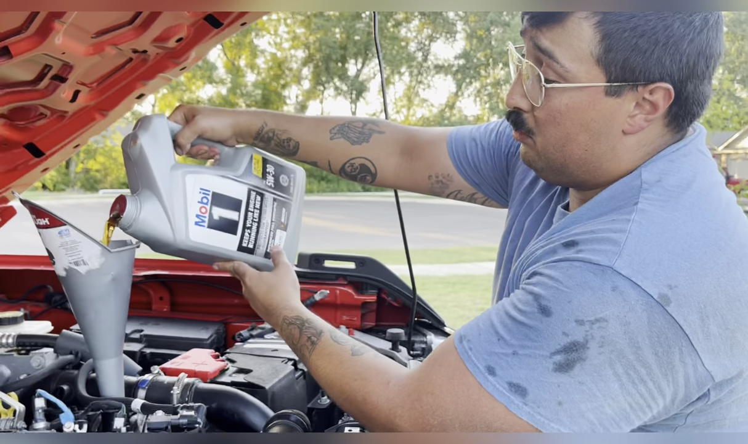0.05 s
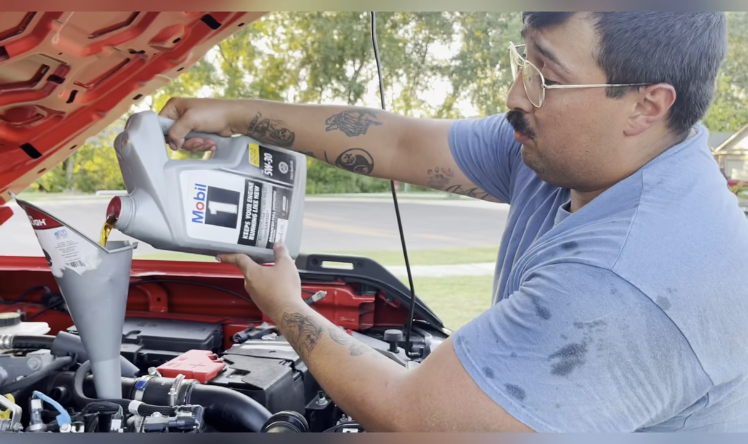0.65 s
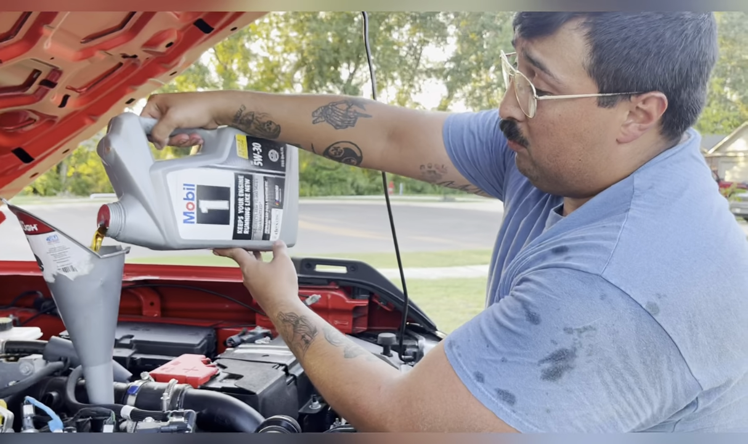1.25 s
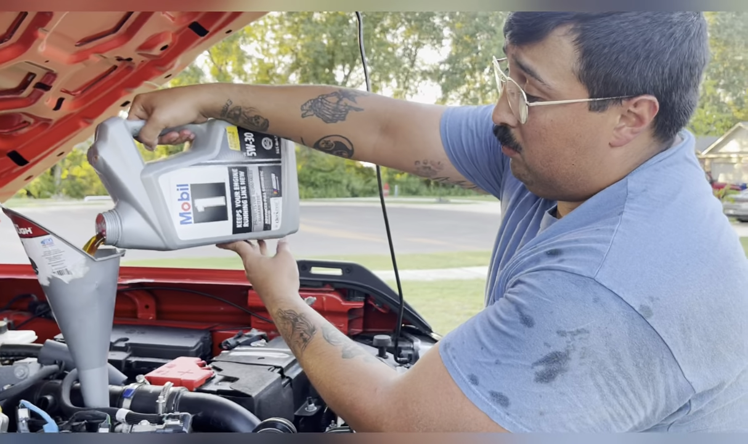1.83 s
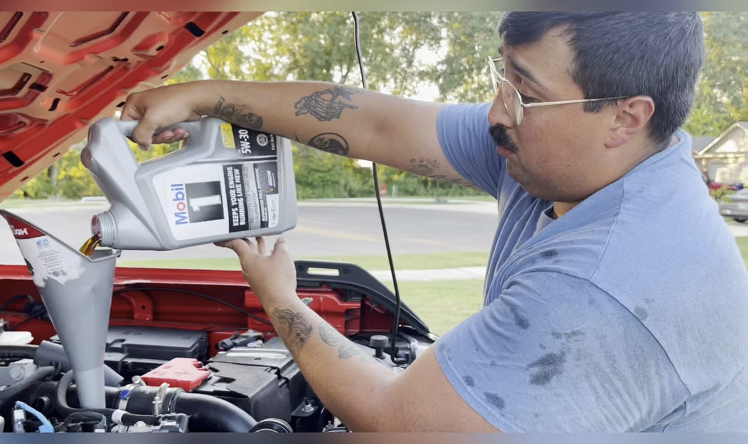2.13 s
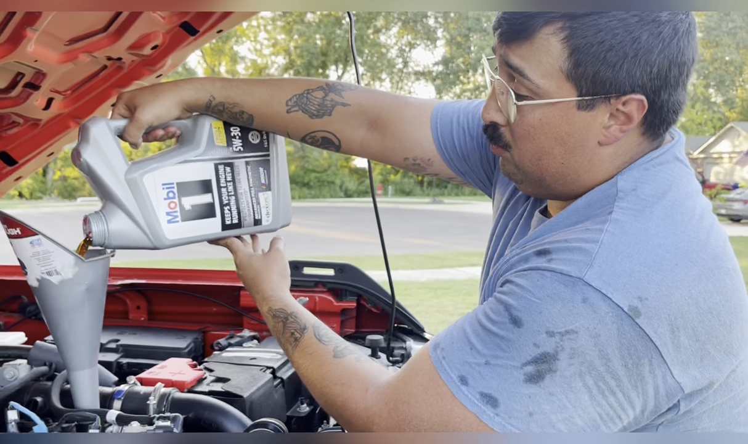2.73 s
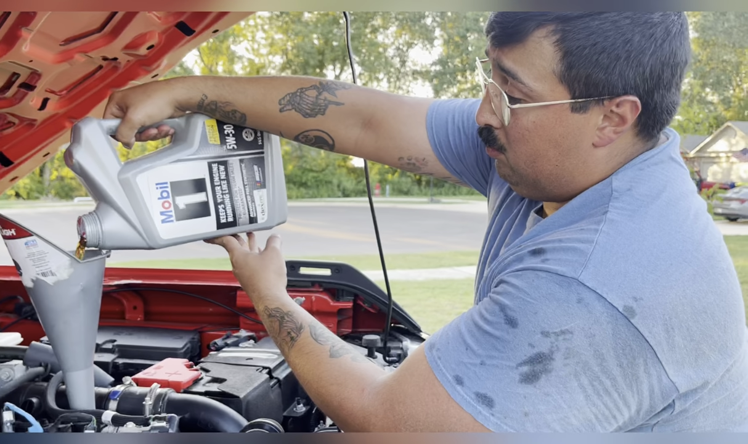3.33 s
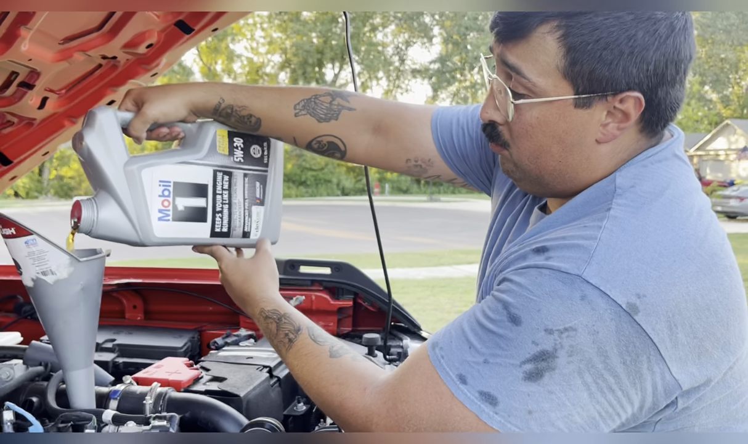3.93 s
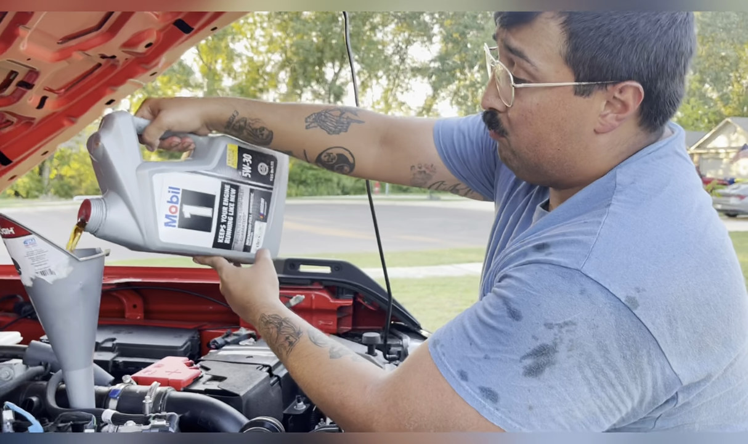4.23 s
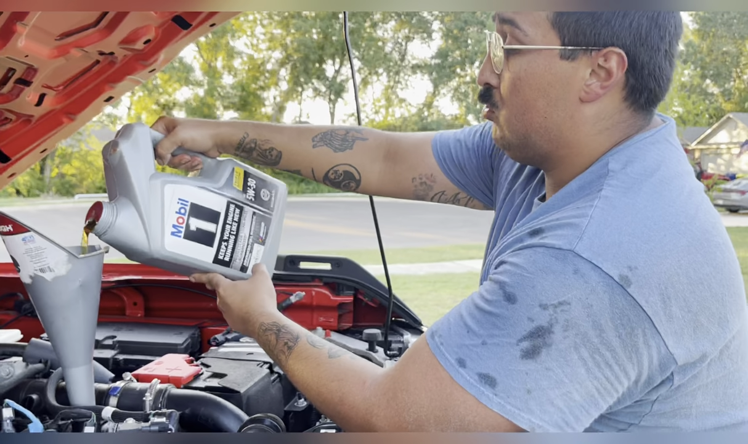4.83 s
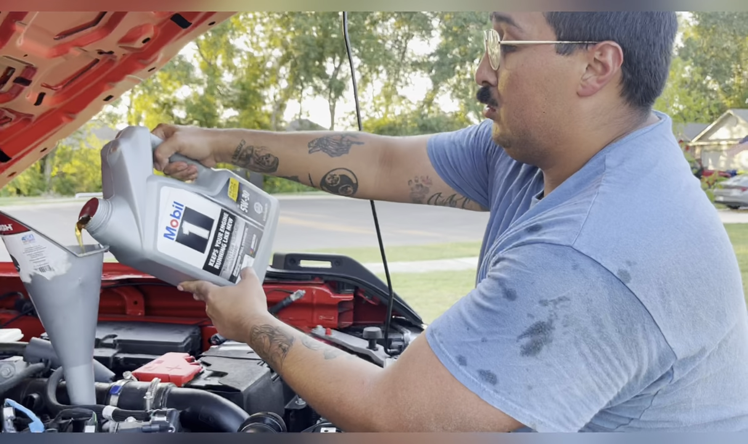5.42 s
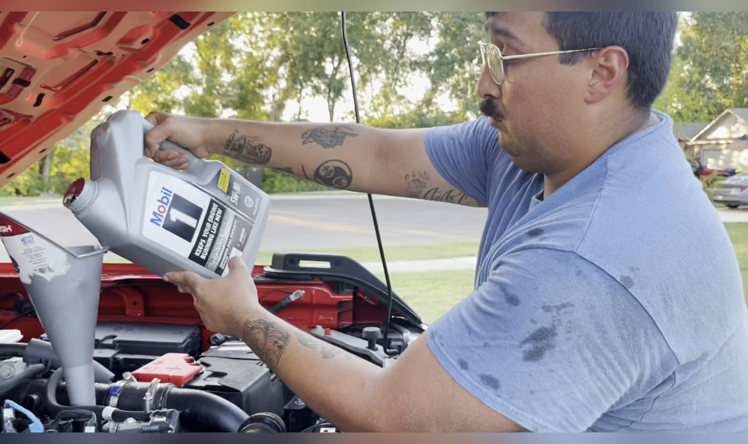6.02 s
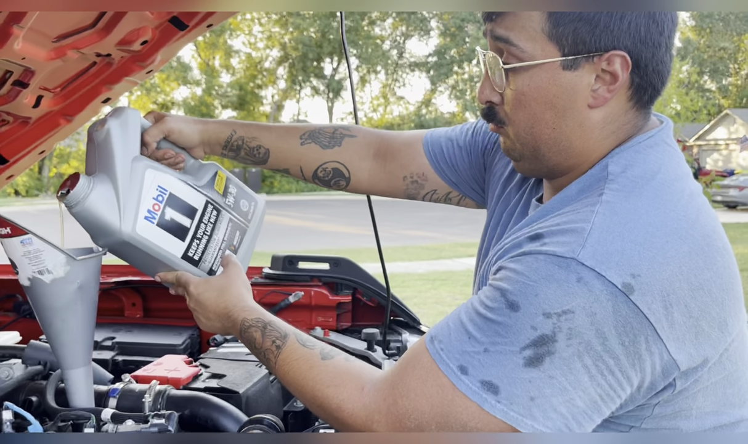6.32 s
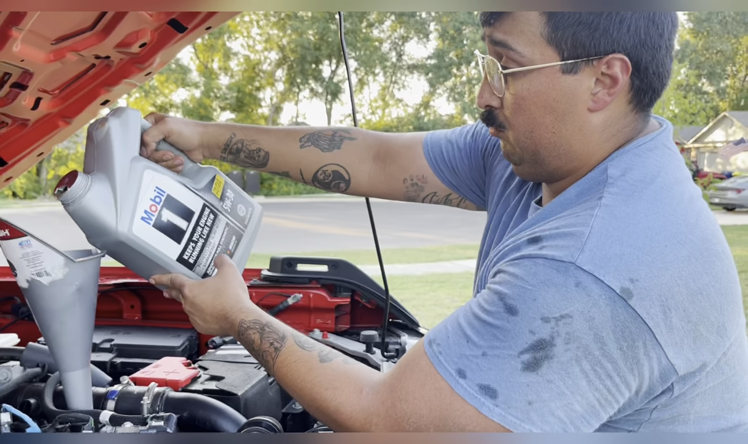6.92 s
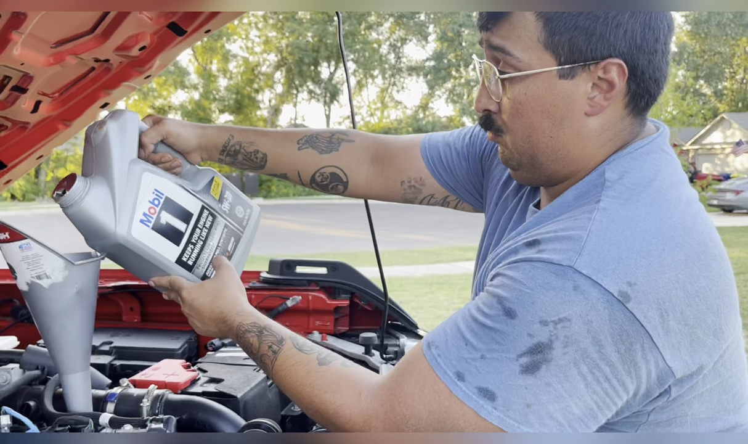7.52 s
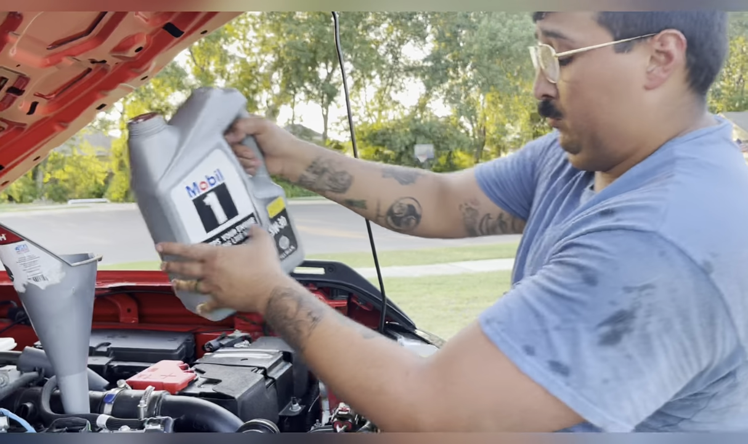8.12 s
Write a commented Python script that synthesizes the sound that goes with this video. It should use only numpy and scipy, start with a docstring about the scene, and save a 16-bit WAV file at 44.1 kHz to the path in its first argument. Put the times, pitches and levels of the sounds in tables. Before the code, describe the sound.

Outdoors near a quiet road, insects keep up a continuous high chorus over a dull wash of distant traffic. The handheld microphone picks up soft thumps and rumble throughout, and a far bird gives one quick whistle early on. From about the middle, a nearby plastic jug knocks, crinkles and rubs under the fingers for a couple of seconds, settles, and taps lightly again at the close.

```python
"""Trees full of insects hiss beside a quiet road: countless wing scrapes merge into a swelling chorus,
with thin trills and, now and then, a nearer rasp. A plastic oil jug is tipped back: its walls ring
when knocked, snap as they flex and rub under the fingers, with a short echo from an engine bay.
The hand holding the two-port microphone makes soft bumps and rumble.
In the background a far bird whistles briefly and distant traffic hums."""
import sys
import numpy as np
from scipy import signal
from scipy.fft import rfft, irfft
from scipy.io import wavfile

SR = 44100
rng = np.random.default_rng(int(sys.argv[2]) if len(sys.argv) > 2 else 0)


def generate_wav(signal):
    """Clip the signal to [-1, 1] and save it as 16-bit WAV at the path in sys.argv[1]."""
    frames = np.transpose(np.atleast_2d(signal))
    scaled = np.clip(frames, -1, 1) * 32767
    pcm = np.round(scaled).astype(np.int16)
    wavfile.write(sys.argv[1], SR, pcm)


N = 359856
TIME = np.arange(N) / SR
FREQS = np.fft.rfftfreq(N, 1 / SR)

# Spectrum of the wing scrapes: (frequency [Hz], relative density [dB])
INSECT_SPECTRUM = [(2750,-16), (3150,-11.5), (3270,-8), (3830,-8), (4450,-5), (4950,-5), (5400,-2.5),
                   (6170,-0.5), (7150,-3.5), (7800,-0.5), (8610,-3.5), (9320,-9), (10200,-13.5),
                   (11500,-13.5), (11950,-43)]
# Insect hiss in the two channels: (frequency [Hz], coherence [0-1], left lead [rad], left minus right [dB]);
# above about 10 kHz the two channels are set almost alike and in opposite phase near 10.2 kHz, so the hiss
# thins in the middle there
INSECT_STEREO = [(2700, .68, .3, .5), (3300, .63, 1.04, 0), (3800, .59, .69, 1.9), (4400, .76, .35, 2.5),
                 (5000, .62, .75, 3), (6200, .8, .49, 2.3), (6850, .7, .12, 3.5), (7200, .78, .62, 3.6),
                 (7700, .91, .82, 1.6), (8600, .98, 0, .2), (9300, .85, -1.5, .3), (10200, 1, -3.14, 0),
                 (11000, .7, -4.47, 0), (11450, .98, -6.2, 0)]


def insect_chorus(level_db=-42.0, flutter_db=0.5, flutter_hz=70, stray_db=0.6, stray_hz=0.61):
    """Incoherent summation: countless scrapes merge into hiss, in three groups that share one swell."""
    # Swell of the whole chorus: (time [s], level [dB])
    swell_points = [(0.1, 3), (0.6, -0.5), (1.05, -0.5), (1.38, 3), (1.75, 0.6), (2.62, 1.7), (3.35, -2.5),
                    (3.65, 1.5), (3.97, 2.5), (4.45, -0.5), (4.85, 2), (5.25, 2.5), (5.5, -0.5), (6.0, 2),
                    (6.42, 2.2), (7.22, -1.5), (7.5, 0.5), (8.16, 1.5)]
    # Insect groups: (centre [Hz], relative level [dB], share of the swell [ratio], drift [dB/s])
    groups = [(4450, 0.35, 0.39, -0.13), (5900, 0.5, 0.66, -0.29), (7400, -0.7, 0.82, 0.04)]
    swell_db = np.interp(TIME, *np.transpose(swell_points))
    centres = [row[0] for row in groups]
    hiss = rfft(unit_rms(band_pass(diffuse_field(INSECT_SPECTRUM, INSECT_STEREO), 2560, 10720, order=8)))
    out = np.zeros((2, N))
    for weights, (_, db, follow, drift) in zip(np.eye(len(groups)), groups):
        group = irfft(hiss * np.interp(FREQS, centres, weights), N)
        chance_db = stray_db * wander(stray_hz) + flutter_db * wander(flutter_hz)
        out += group * amp(level_db + db + follow * swell_db + drift * TIME + chance_db)
    return patchy(out)


def insect_trills(fade_db=3.5, fade_hz=4):
    """Narrow-band modulation: single insects each hold one wavering pitch, and come and go."""
    # Trills: (pitch [Hz], level [dB], half-bandwidth [Hz])
    voices = [(3270, -69.5, 58), (3480, -74.5, 36), (3675, -70, 30), (3895, -70, 31), (4260, -65.5, 85),
              (4540, -66, 31), (6770, -67, 60)]
    out = np.zeros((2, N))
    for hz, db, width_hz in voices:
        tone = narrow_noise(2 * np.pi * hz * TIME, width_hz)
        out += ports(amp(db + fade_db * wander(fade_hz)) * tone, left_db=1.9, lead_ms=0.025)
    return out


def insect_rasps(grain_db=1.5, grain_hz=90):
    """Stridulation: nearer insects make short grainy scrapes, each within its own wing resonance."""
    # Rasps: (midpoint [s], duration [s], level [dB], lower edge [Hz], upper edge [Hz])
    calls = [(0.533, 0.38, -47.5, 3300, 4750), (0.868, 0.5, -55, 5670, 6000),
             (1.363, 0.39, -47.5, 3170, 4860), (2.103, 0.3, -46, 3260, 5000), (2.234, .16, -51, 5100, 5800),
             (2.42, 0.55, -53, 5550, 6100), (2.747, 0.26, -57, 4150, 4450),
             (4.143, 0.22, -49.5, 4120, 4560), (5.245, 0.33, -53, 4260, 4540),
             (7.55, 0.58, -55, 4200, 4480)]
    scrape = diffuse_field(INSECT_SPECTRUM, INSECT_STEREO) * amp(grain_db * wander(grain_hz))
    return sum(amp(db) * stroke(s, length) * unit_rms(band_pass(scrape, lo, hi, order=10))
               for s, length, db, lo, hi in calls)


def jug_knocks(wall_db=1, shell_db=-7, rise_s=0.0018, upper_db=-9, upper_ratio=1.306,
               chatter_db=-17, chatter_s=0.0078, sag=0.067, sag_s=0.0052):
    """Damped modes: the struck spot sets the wall's pitch, which sags as it relaxes; the shell rings."""
    # Knocks: (time [s], level [dB], wall pitch [Hz], shell share [dB], 60 dB decay [cycles])
    impacts = [(0.003, -36.5, 356, -12, 29), (0.388, -38.5, 325, -13, 20), (3.476, -23.5, 394, -28, 9.6),
               (3.495, -35, 370, -16, 16), (3.501, -30, 363, -26, 13), (3.516, -37, 430, -22, 17),
               (3.543, -25, 308, -22, 6.9), (3.557, -34, 250, -24, 13), (3.734, -31.5, 367, -21, 9.5),
               (3.929, -33.5, 1330, -19, 35), (3.969, -30, 330, -15, 15), (3.978, -24.5, 403, -18, 6.8),
               (3.987, -38, 1360, -16, 45), (4.07, -42, 293, -21, 19), (4.402, -21, 560, -32, 10),
               (4.469, -36.5, 325, -8, 19), (4.479, -46, 395, -20, 16), (4.524, -42, 510, -23, 50),
               (4.774, -28, 310, -27, 13), (4.799, -23.5, 700, -20, 17), (4.818, -23.5, 587, -18.5, 15),
               (4.838, -32, 1300, -13, 30), (4.846, -23.5, 640, -18, 22), (4.871, -35, 1400, -19, 40),
               (4.876, -37.5, 477, -9, 22), (4.918, -32.5, 596, -21, 27), (5.044, -44.5, 910, -15, 69),
               (5.275, -38.5, 706, -8, 25), (5.3, -34.5, 2145, -13, 55), (5.439, -41, 338, -26, 36),
               (5.444, -34.5, 560, -20, 33), (5.457, -38.5, 653, -11, 19), (5.702, -36.5, 480, -22, 12),
               (7.832, -36, 1160, -24, 20), (7.837, -42, 694, -21, 19), (7.999, -45, 660, -13, 22),
               (8.076, -39.5, 604, -8, 18)]
    # Modes of the stiff parts of the plastic: (frequency [Hz], relative level [dB], 60 dB decay [s])
    shell_modes = [(930, 7.5, 0.027), (1160, 2.5, 0.015), (1350, 15, 0.0087), (1820, 8, 0.03),
                   (3200, 0, 0.019), (3600, -5, 0.022)]
    t, out = np.arange(SR // 8) / SR, np.zeros(N)
    for s, db, hz, treble_db, cycles in impacts:
        phase = phase_of(hz * (1 + sag * np.exp(-t / sag_s)))
        wall = np.sin(phase) + amp(upper_db) * np.sin(upper_ratio * phase)
        wall *= amp(wall_db - 60 * t * hz / cycles) * (1 - np.exp(-t / rise_s))
        ring = sum(amp(mode_db - 60 * t / t60) * np.sin(2 * np.pi * f * rng.uniform(0.9, 1.06) * t)
                   for f, mode_db, t60 in shell_modes)
        chatter = amp(chatter_db) * rng.standard_normal(len(t)) * np.exp(-t / chatter_s)
        contact = (t == 0) + chatter
        shell = signal.fftconvolve(ring, contact / np.linalg.norm(contact))[:len(t)]
        add(out, s, amp(db) * (wall + amp(shell_db + treble_db) * shell))
    return out


def jug_snaps(grain_db=4, grain_hz=600):
    """Buckling: a crease gives way, and a crinkly burst of grains excites one resonance."""
    # Snaps: (time [s], peak level [dB], centre [Hz], bandwidth [Hz], decay time [s])
    creases = [(.386, -37, 1230, 917, 0.0038), (3.539, -29, 8600, 1800, 0.004),
               (3.541, -32, 7700, 900, .004), (3.541, -39, 11200, 2000, 0.0037),
               (3.543, -37, 1510, 900, 0.0022), (3.549, -40, 1730, 450, 0.0083),
               (3.955, -33.5, 3100, 2200, 0.017), (3.973, -38, 11500, 1500, 0.013),
               (4.419, -37, 885, 700, 0.0031), (4.467, -43, 1470, 1100, .0027),
               (4.798, -33.5, 3580, 700, 0.0027), (4.847, -43, 1750, 700, .003),
               (4.917, -41, 1700, 1800, 0.0033), (5.046, -31.5, 796, 1200, 0.0019),
               (5.298, -37.5, 1530, 1200, 0.0041), (5.302, -35, 2670, 1200, .003),
               (7.833, -38.5, 950, 500, .011)]
    t, out = np.arange(SR // 10) / SR, np.zeros(N)
    grains = rng.standard_normal(N) * amp(grain_db * wander(grain_hz))
    for s, db, hz, width_hz, decay_s in creases:
        ring = t * np.exp(-np.pi * width_hz * t) * np.sin(2 * np.pi * hz * t)
        force = grains[round(s * SR):][:len(t)] * np.exp(-t / decay_s)
        burst = signal.fftconvolve(ring, force)
        add(out, s, amp(db) * burst / abs(burst).max())
    return out


def finger_rubs(grain_db=4, grain_hz=160):
    """Stick-slip friction: skin catches and slides on the plastic, making grainy noise."""
    # Finger slides: (midpoint [s], duration [s], level [dB])
    slides = [(3.505, 0.21, -48.5), (3.91, 0.047, -48), (3.977, 0.071, -45), (4.023, 0.077, -47.5),
              (4.413, 0.05, -49.5), (4.515, 0.23, -50.5), (5.423, 0.29, -56), (7.88, 0.16, -53),
              (8.1, 0.16, -54.5)]
    # Friction spectrum: (frequency [Hz], relative density [dB])
    rub_spectrum = [(40, -14), (120, 2), (330, 14), (600, 6.5), (950, -1), (1350, 0.5), (2200, -6),
                    (3100, -5), (5000, -36), (12000, -75)]
    slips = unit_rms(amp(grain_db * wander(grain_hz)))
    return slips * noise(rub_spectrum) * sum(amp(db) * stroke(s, length) for s, length, db in slides)


def jug_swishes(grain_db=4.0, grain_hz=250):
    """Resonance driven by friction: a narrow band of grainy rubbing noise glides in pitch."""
    # Swishes: (start [s], duration [s], level [dB], first [Hz], last [Hz], half-bandwidth [Hz])
    glides = [(3.476, 0.021, -44, 480, 535, 50), (3.528, 0.044, -50, 3080, 3200, 130),
              (3.893, 0.093, -51, 720, 398, 55), (3.976, 0.045, -55, 855, 1160, 130),
              (4.372, 0.034, -51, 1895, 1300, 500), (4.39, 0.013, -41, 1296, 1000, 120),
              (4.79, 0.01, -39, 880, 900, 120), (4.859, 0.031, -46, 760, 1210, 220)]
    out = np.zeros(N)
    for s, length, db, first_hz, last_hz, width_hz in glides:
        hz = first_hz * (last_hz / first_hz) ** np.clip((TIME - s) / length, 0, 1)
        out += amp(db) * stroke(s + length / 2, length) * narrow_noise(phase_of(hz), width_hz)
    return out * unit_rms(amp(grain_db * wander(grain_hz)))


def engine_bay_echo(x, wet_db=-9, t60=0.058, echoes_per_s=2000, gap_s=0.003):
    """Scattering: the raised bonnet and the engine return dense reflections that soon die away."""
    t = np.arange(SR // 4) / SR
    taps = rng.standard_normal((2, len(t))) * (rng.random((2, len(t))) < echoes_per_s / SR)
    taps *= amp(-60 * t / t60) * (t > gap_s)
    return amp(wet_db) * signal.fftconvolve(x[None], taps / np.linalg.norm(taps[0]), axes=1)[:, :N]


def microphone_bumps(rest_hz=62, start_ratio=2.12, settle_s=0.0053, left_lag_rad=0.77):
    """Stiffness sets pitch: each push starts stiff and high, then sinks to the slow sway of the grip."""
    # Pushes on the microphone body: (time [s], envelope peak [dB], nominal pitch [Hz], rise time [s])
    pushes = [(0.733, -33, 94.5, 0.0054), (0.843, -23, 52, 0.014), (0.937, -33, 90, 0.0076),
              (0.977, -33, 62, 0.0089), (1.023, -31.5, 125, 0.0058), (1.116, -32.5, 50, 0.015),
              (1.172, -25.5, 72, 0.012), (1.258, -32, 96, 0.0053), (1.287, -31, 55, 0.017),
              (1.337, -29, 58, 0.015), (1.376, -35, 174, 0.0037), (1.422, -27, 112, 0.0065),
              (1.432, -25, 72, .01), (1.521, -29.5, 80, 0.0068), (2.095, -32.5, 147, 0.0065),
              (2.826, -29.5, 79, 0.0067), (3.325, -37, 110, 0.0055), (3.376, -37, 90, .006),
              (3.43, -26.5, 163, 0.0055), (4.035, -30, 106, 0.0044), (4.072, -33.5, 150, 0.0037),
              (4.173, -29, 78, 0.0072), (4.405, -24.5, 176, 0.0057), (4.421, -21.5, 260, 0.0017),
              (4.426, -23.5, 105, .006), (4.437, -27.5, 65, 0.0072), (4.48, -24.5, 164, 0.0035),
              (4.497, -29, 62, 0.011), (4.58, -35, 86, 0.0061), (4.74, -33, 167, 0.0056),
              (4.751, -26.5, 116, 0.0057), (4.774, -24.5, 161, 0.003), (4.893, -34, 86, 0.0078),
              (5.078, -38.5, 89.5, 0.0068), (5.246, -37, 70, 0.0064), (5.6, -31, 95, 0.0065),
              (5.626, -28, 104, 0.006), (5.702, -26.5, 140, 0.0069), (6.766, -33.5, 152, 0.0041),
              (6.835, -32.5, 110, 0.0041), (6.869, -37, 190, 0.0025), (6.889, -32.5, 150, .006),
              (6.919, -33.5, 188, 0.003), (6.926, -33, 70, 0.013), (7.231, -39, 170, .005),
              (7.276, -38, 170, 0.0037), (7.294, -34, 62, .009), (7.355, -35, 115, 0.0048),
              (7.44, -41, 140, 0.0084), (7.466, -38, 62, 0.013), (7.795, -40, 85, .009)]
    t, out = np.arange(SR // 8) / SR, np.zeros((2, N))
    for s, db, hz, rise_s in pushes:
        phase = phase_of(rest_hz + (start_ratio * hz - rest_hz) * np.exp(-t / settle_s))
        strength = amp(db) * (t / rise_s * np.exp(1 - t / rise_s)) ** 2
        for channel, lag in zip(out, [left_lag_rad, 0]):
            add(channel, s, strength * np.sin(phase - lag))
    return out


def grip_rumble():
    """Structure-borne sound: the hand shakes the microphone, with a higher grumble on firm moves."""
    # Shifts of the grip: (midpoint [s], duration [s], rumble level [dB], grumble level [dB])
    shifts = [(.18, 1, -46.5, -63.5), (0.554, .12, -41.5, -69), (0.773, 0.27, -39, -71),
              (0.975, 0.16, -37.5, -70), (1.167, 0.42, -43, -53), (1.366, 0.33, -36, -63),
              (1.637, 0.61, -46.5, -62), (2.103, 0.17, -46, -58), (2.608, 0.16, -43.5, -55),
              (2.86, 0.13, -41.5, -53), (3.751, 0.05, -66, -51), (4.097, 0.18, -42, -53),
              (4.184, 0.059, -40, -53), (4.31, 0.31, -54, -53.5), (4.427, 0.054, -34, -31.5),
              (4.498, 0.043, -38, -42), (4.588, 0.068, -36.5, -45.5), (4.7, 0.18, -42, -68),
              (4.755, 0.065, -39, -38.5), (4.804, 0.072, -40, -67), (5.493, 0.21, -41, -49),
              (5.59, 0.22, -42, -52), (5.694, 0.078, -55, -45), (5.836, 0.048, -47, -49.5),
              (6.767, 0.22, -48.5, -51.5), (6.898, 0.2, -42, -47), (7.354, 0.3, -47.5, -51.5),
              (7.99, 0.49, -54.5, -54)]
    # Spectrum of the deep rumble: (frequency [Hz], relative density [dB])
    rumble_spectrum = [(20, -63), (40, -8), (65, 0.5), (100, -4.5), (140, -12.5), (220, -25), (500, -75),
                       (2000, -110)]
    # Spectrum of the higher grumble: (frequency [Hz], relative density [dB])
    grumble_spectrum = [(60, -17), (135, 0), (170, -2.5), (200, 2.5), (280, -4), (400, -15), (900, -23),
                        (4000, -100)]
    _, _, deep_db, firm_db = np.transpose(shifts)
    rumble = shake(rumble_spectrum, shifts, deep_db, tremor_db=-59, waver_db=5.5, apart=0.23)
    grumble = shake(grumble_spectrum, shifts, firm_db, tremor_db=-61.0, waver_db=1.5, apart=0.36)
    return rumble + grumble


def shake(spectrum, shifts, levels, tremor_db, waver_db, apart, waver_hz=5):
    """Power addition: grip shifts rise over a faint tremor; the ports shake a little differently."""
    power = sum((amp(db) * stroke(s, length)) ** 2 for (s, length, *_), db in zip(shifts, levels))
    tremor = amp(tremor_db + waver_db * wander(waver_hz))
    side = apart * noise(spectrum)
    common = ports(noise(spectrum), left_db=0.45, lead_ms=-0.26)
    return np.sqrt(power + tremor ** 2) * (common + np.array([side, -side]))


def far_bird(hoarse_hz=150):
    """Spectral broadening: a far bird's quick whistles are hoarse, and smeared by the trees."""
    # Whistles: (midpoint [s], duration [s], level [dB], first pitch [Hz], last pitch [Hz])
    whistles = [(2.044, 0.047, -49, 4620, 4820), (2.08, 0.1, -50, 4790, 4750),
                (2.123, 0.068, -50, 4520, 4580)]
    out = np.zeros(N)
    for s, length, db, first_hz, last_hz in whistles:
        hz = np.interp(TIME - s, [-length / 2, length / 2], [first_hz, last_hz])
        out += amp(db) * stroke(s, length) * narrow_noise(phase_of(hz), hoarse_hz)
    return ports(out, left_db=2, lead_ms=0.017)


def far_traffic(level_db=-51, drift_db=0.78, drift_hz=5):
    """Diffuse sound: far roads merge into a dull wash whose level drifts a little."""
    # Traffic spectrum: (frequency [Hz], relative density [dB])
    road_spectrum = [(25,-32), (45,-6.5), (70,-3), (120,0), (178,-11.5), (298,-11.5), (494,-12.5),
                     (870,-12), (1250,-14.5), (1790,-19.5), (2520,-21)]
    # Traffic at the ports: (frequency [Hz], coherence [0-1], left lead [rad], left minus right [dB])
    road_ports = [(45, 0.9, -0.53, 9), (121, 0.67, 0.78, -4.5), (312, 0.91, 0.51, -1.5),
                  (500, 0.07, -0.54, -0.5), (790, 0.52, 1.85, 1.5), (1240, 0.21, 0.59, -1.2),
                  (1800, 0, -0.88, -1.5), (2450, 0.72, 0.3, -0.5)]
    strength = amp(level_db + drift_db * wander(drift_hz))
    return strength * unit_rms(band_pass(diffuse_field(road_spectrum, road_ports), 24, 2700, order=6))


def amp(db):
    """Decibels to gain."""
    return 10 ** (np.asarray(db) / 20)


def unit_rms(x):
    """Normalisation to rms 1."""
    return x / np.sqrt(np.mean(x ** 2) + 1e-20)


def phase_of(hz):
    """Phase [rad] as the running integral of frequency."""
    return 2 * np.pi * np.cumsum(hz) / SR


def stroke(middle, length):
    """Half-cosine envelope: a smooth rise and fall around a moment."""
    return np.cos(np.pi * np.clip((TIME - middle) / length, -0.5, 0.5))


def add(mix, s, sound):
    """Mixes a sound in at time s."""
    part = mix[max(round(s * SR), 0):][:len(sound)]
    part += sound[:len(part)]


def curves(table):
    """Interpolation of a spectrum table's columns over log frequency."""
    hz, *columns = np.transpose(table)
    return [np.interp(np.log(FREQS + 1), np.log(hz + 1), column) for column in columns]


def noise(spectrum):
    """Spectral shaping of white noise, scaled to rms 1."""
    return unit_rms(irfft(rfft(rng.standard_normal(N)) * amp(curves(spectrum)[0]), N))


def wander(rate_hz):
    """Low-pass noise: a smooth random fluctuation of rms 1."""
    return unit_rms(irfft(rfft(rng.standard_normal(N)) / (1 + (FREQS / rate_hz) ** 4), N))


def narrow_noise(phase, width_hz):
    """Random quadrature modulation spreads a tone by about width_hz to each side."""
    return wander(width_hz) * np.cos(phase) + wander(width_hz) * np.sin(phase)


def band_pass(x, lo_hz, hi_hz, order=4):
    """Zero-phase band-pass filter."""
    hz = FREQS + 1e-3
    power_loss = (1 + (lo_hz / hz) ** (2 * order)) * (1 + (hz / hi_hz) ** (2 * order))
    return irfft(rfft(x) / np.sqrt(power_loss), N)


def patchy(x, depth_db=1.0, width_hz=90, last_s=0.05):
    """Random amplitude modulation: narrow bands swell and fade, each by itself."""
    hz, t, spectra = signal.stft(x, SR, nperseg=1024, noverlap=768)
    chance = rng.standard_normal(spectra.shape[1:])
    for axis, (grid, reach) in enumerate([(hz, width_hz), (t, last_s)]):
        blur = np.exp(-((grid - np.median(grid)) / reach) ** 2)
        chance = signal.fftconvolve(chance, np.expand_dims(blur, 1 - axis), "same", axes=axis)
    spectra = spectra * amp(depth_db * unit_rms(chance))
    return signal.istft(spectra, SR, nperseg=1024, noverlap=768)[1][:, :N]


def diffuse_field(spectrum, port_table):
    """Partial coherence: sound from all around reaches the two ports partly alike and out of step."""
    coherence, lead, balance_db = curves(port_table)
    coherence = np.clip(coherence, 0, 1)
    left, independent = rfft(rng.standard_normal((2, N)))
    right = (coherence * left + np.sqrt(1 - coherence ** 2) * independent) * np.exp(-1j * lead)
    pair = np.array([left * amp(balance_db / 2), right * amp(-balance_db / 2)])
    return irfft(pair * amp(curves(spectrum)[0]), N)


def ports(x, left_db, lead_ms):
    """Level and time differences: positive values make the left port louder and earlier."""
    delayed = np.interp(TIME - lead_ms / 1000, TIME, x)
    return np.array([x * amp(left_db / 2), delayed * amp(-left_db / 2)])


def scene():
    """Superposition of the insects, the jug, the hand and the far background at the two ports."""
    plastic = jug_knocks() + finger_rubs() + jug_swishes()
    insects = insect_chorus() + insect_trills() + insect_rasps()
    background = far_bird() + far_traffic()
    hand = grip_rumble() + microphone_bumps()
    jug = ports(plastic, left_db=3.9, lead_ms=0.13) + jug_snaps() + engine_bay_echo(plastic)
    return insects + jug + hand + background


def record(dry):
    """Band limiting: a steep low-pass filter removes the highest treble."""
    edge_hz = 12700
    taps = signal.firwin(511, edge_hz, window=("kaiser", 9), fs=SR)
    return signal.oaconvolve(dry, taps[None], "same")


dry = scene()
out = record(dry)
generate_wav(out)
```